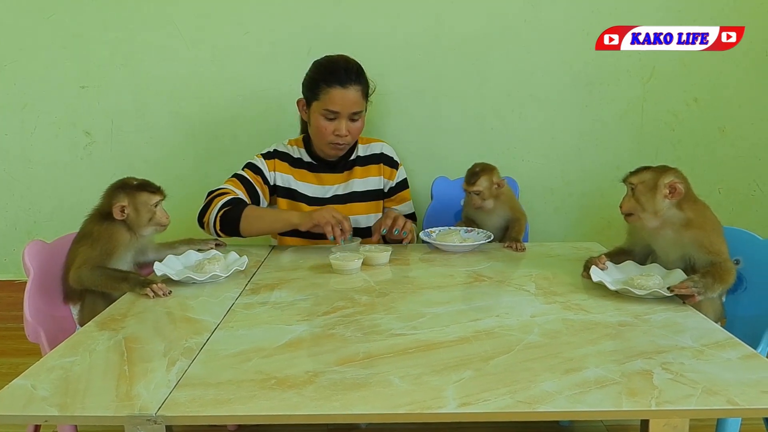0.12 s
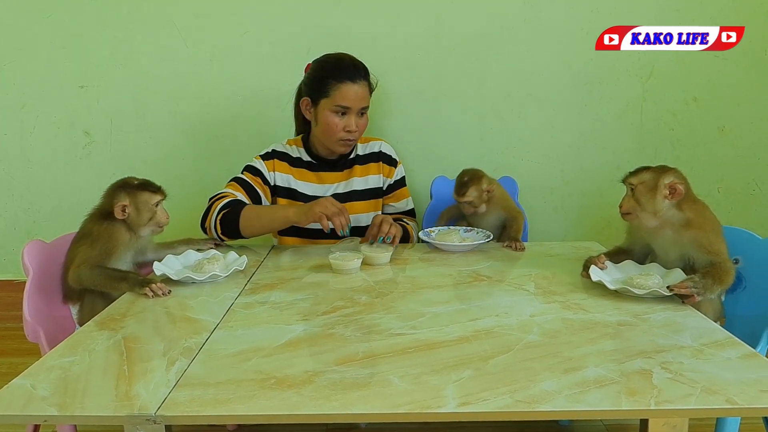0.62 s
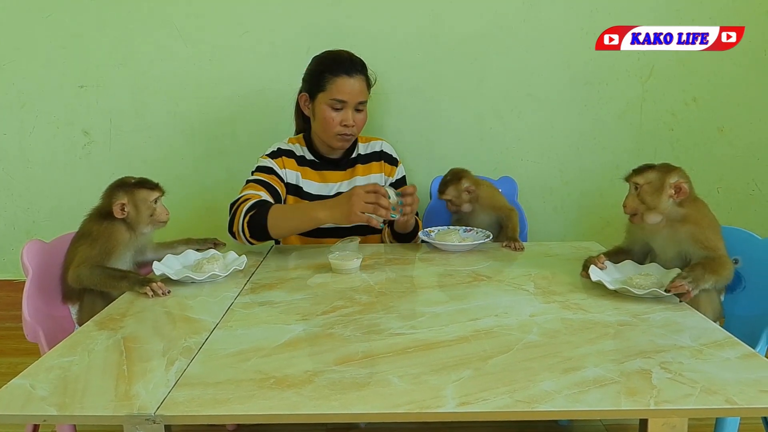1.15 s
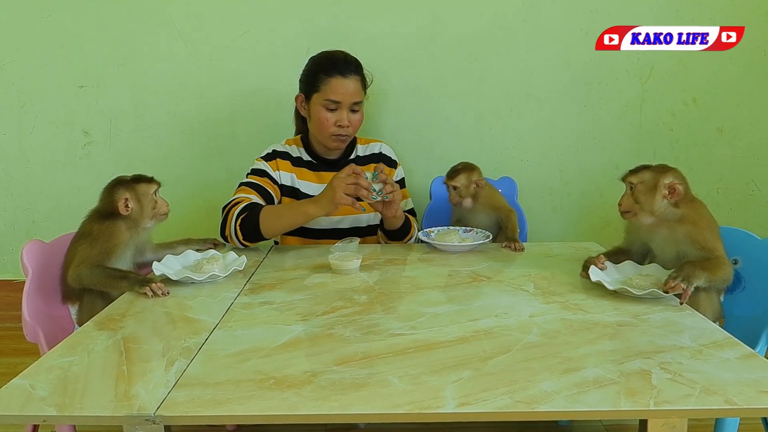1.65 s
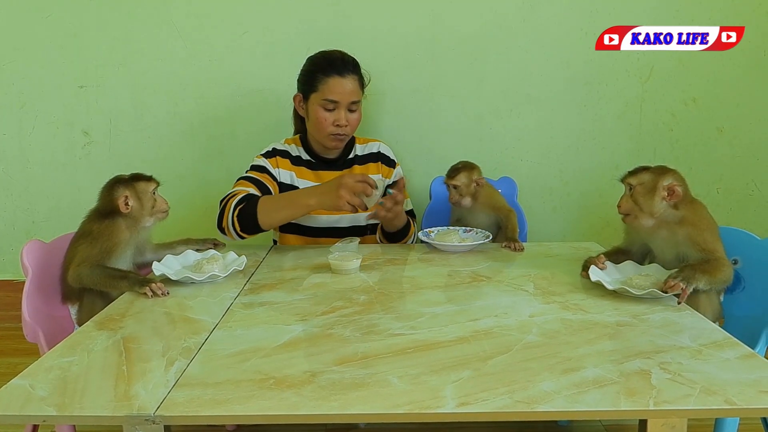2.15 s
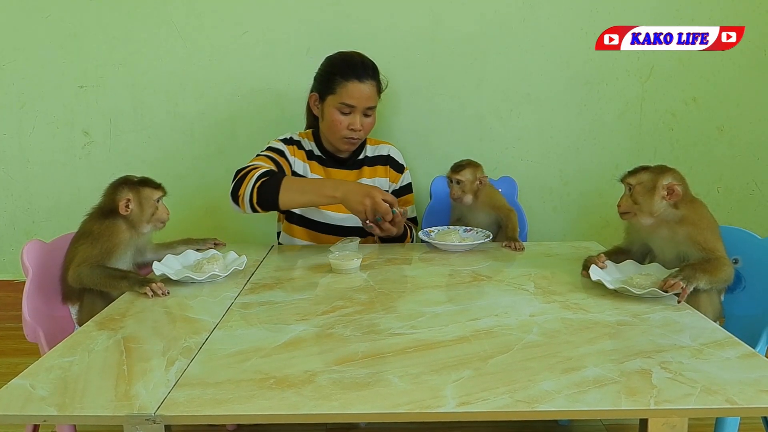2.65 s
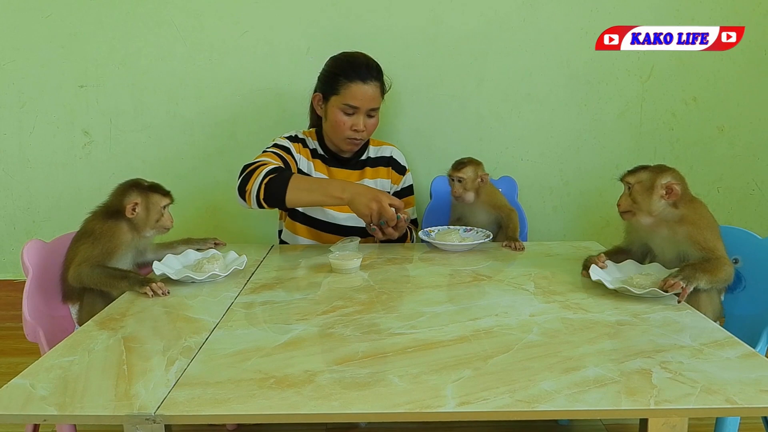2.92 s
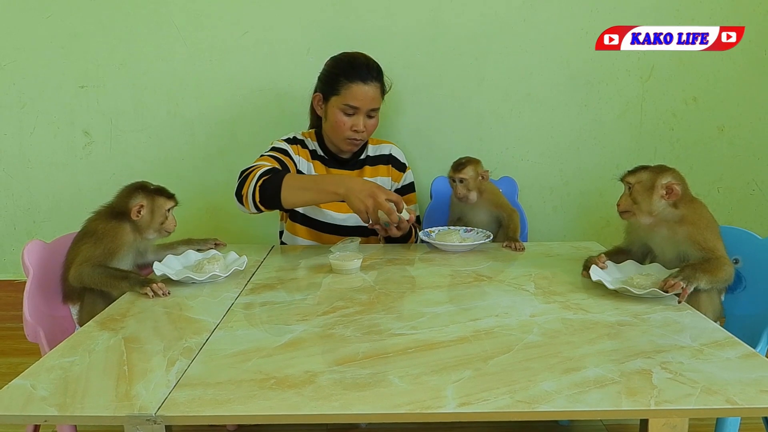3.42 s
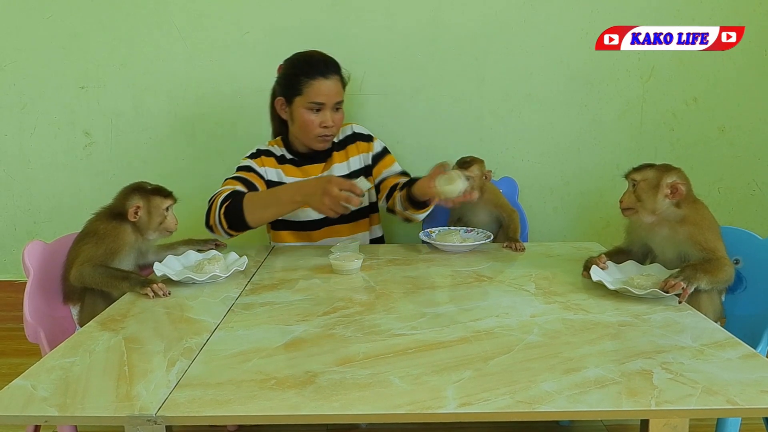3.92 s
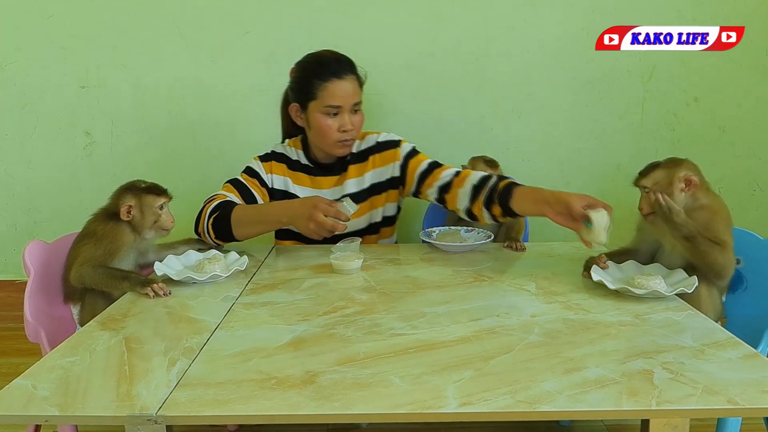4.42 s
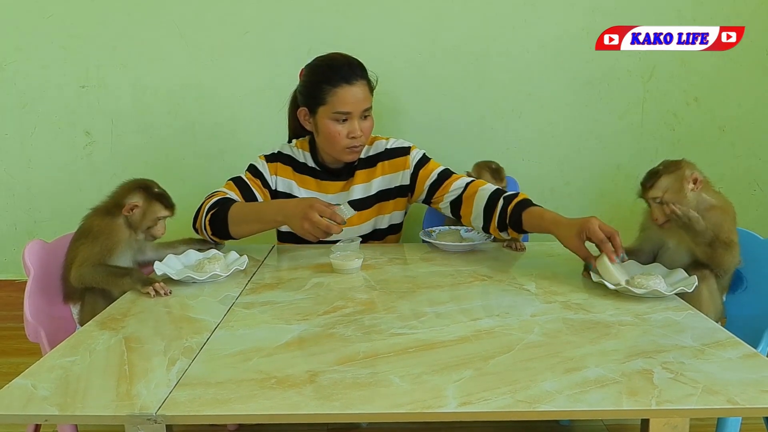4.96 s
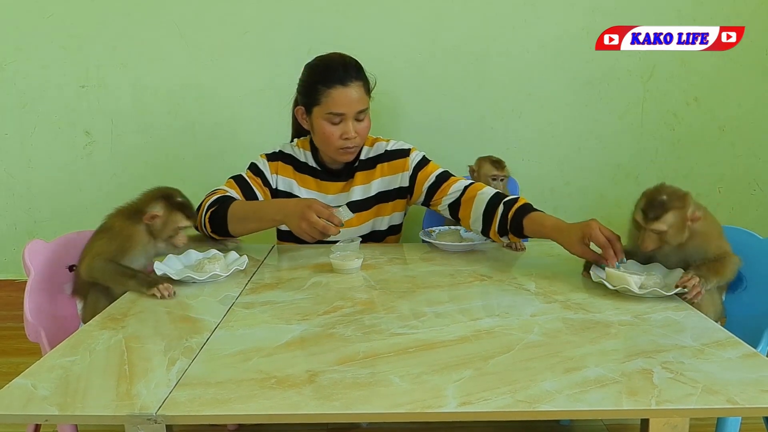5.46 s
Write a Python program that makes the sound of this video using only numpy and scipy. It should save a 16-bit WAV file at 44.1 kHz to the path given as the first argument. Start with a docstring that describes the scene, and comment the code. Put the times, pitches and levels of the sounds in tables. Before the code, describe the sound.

Small plastic cups buckle and click close to a table in a bare, reverberant room. An early pop leads to sparse faint rustles, then a violent crackling snap around the middle that briefly ducks the background. After soft ticks, a plate clatters down with more cup crackle near the end. Low motor hum and soft air noise lie underneath, picked up by a single microphone, stronger on the right.

```python
"""Plastic cups and plates in a bare room

Thin cup walls snap: short crackles shaped by the wall modes. Plates knock on a table: hits ring
a bank of modes. Dull ticks, faint rustling clicks and two low air thumps lie among them.
Hard walls add echoes and a long tail; filtered-noise air and wavering motor tones lie below.
One microphone signal feeds two unequal channels, under a gain control that ducks at loud blows.
"""
import sys
import numpy as np
from scipy import signal
from scipy.fft import rfft, irfft
from scipy.io import wavfile
from scipy.ndimage import uniform_filter1d

SR = 44100
rng = np.random.default_rng(int(sys.argv[2]) if len(sys.argv) > 2 else 0)


def amplitude_ratio(level_db):
    """Convert a level in decibels to the matching linear amplitude (field) ratio."""
    exponent = np.asarray(level_db, float) / 20
    return 10 ** exponent


def unload_audio(sound):
    """Save the sound as a 16-bit wav file, at the path given as the first command line argument."""
    columns = np.transpose(np.atleast_2d(sound))
    # keep every value between -1 and 1, then stretch to whole-number steps
    steps = np.round(np.clip(columns, -1, 1) * 32767)
    wavfile.write(sys.argv[1], SR, steps.astype(np.int16))


N = 246078
LEAD = SR // 4   # samples ahead of t = 0, for sounds that begin before it

# Cup wall buckling: t/s, energy sent to the walls/dB, best-driven f/Hz,
# fall-off away from it/(dB/octave), direct relative to sent/dB
CUP_SNAPS = [(-.03, -21.5, 4200, 15, -3), (.087, -13, 2240, 17.5, 1.5), (.314, -32.5, 5530, 60, 5.5),
             (0.574, -31, 3800, 14, -5), (0.647, -24.5, 1280, 40, 6), (0.809, -24.5, 7900, 9, -6),
             (.8677, -1, 2740, 2.8, 9.5), (1.271, -30.5, 2650, 55, -11), (1.449, -38, 4900, 12, 3),
             (1.643, -31, 2370, 10, -3), (1.732, -43, 8500, 25, 11), (1.869, -41.5, 6950, 20, 7),
             (1.97, -36.5, 4160, 21, -4), (2.07, -23.5, 860, 7.5, 0.5), (2.28, -37.5, 7800, -5, 1),
             (2.607, -30.5, 5340, 42, 3), (2.748, -38, 3100, 37, 5), (2.93, -33.5, 1240, 6, 1.5),
             (3.04, -25, 1680, 3.5, -6), (3.066, -9.5, 4160, 6.5, 0), (3.083, -10, 960, 10, 3),
             (3.093, -12.5, 4660, 6, 3.5), (3.1656, 7, 6550, 8.5, 1.5), (3.169, 11, 1780, 37.5, -3),
             (3.1688, 7, 1005, 4.5, -3), (3.170, 7, 3660, 5, 1.5), (3.493, -14, 1100, 8, 1),
             (3.95, -39, 6900, 13, 8), (3.964, -33.5, 2470, 48, 6.5), (4.228, -22, 4150, 23, 5),
             (4.52, -43.5, 9100, 50, 5), (4.707, -40, 8700, 42, 12), (4.77, -41.5, 5860, 16.5, -1),
             (4.966, -23.5, 5500, 17, 5), (4.998, -28, 1110, 31, 0), (5.026, -24.5, 2460, 39, 5),
             (5.151, -5.5, 1800, 11, -4), (5.179, -1, 3030, 13, 7.5), (5.405, -28, 3160, 56.5, 20)]
# Cup wall modes: f/Hz, sharpness of each of two passes/(f per width), level/dB
CUP_MODES = [(646, 1.5, -0.5), (1256, 2.2, -4.5), (1780, 1.8, -3.2), (2445, 2.07, 0), (3470, 2.65, 0.9),
             (4150, 3.7, -3.9), (4790, 6.3, -0.5), (5690, 4.8, -2.4), (6820, 2.15, -1.5), (8800, 2.34, 0.1),
             (10400, 3.5, -12), (13600, 2.8, -2.5)]
CRACKLE_S, CRACKLE_SHRINK = 0.003, 2.55   # decay at 0 dB direct; dB shorter per dB direct
BELOW_DB_PER_OCTAVE = 9.5   # extra fall-off below best f: a small cup radiates little bass

# Plate knocks on the table: t/s, energy sent to the walls/dB, best-driven f/Hz,
# fall-off away from it/(dB/octave), direct relative to sent/dB
PLATE_KNOCKS = [(-.02, 3.5, 495, 15.5, 4), (5.004, -17.5, 517, 1.5, -5.5), (5.151, -1, 2090, 10.5, 3.5),
                (5.172, 6.5, 1130, 7.5, -2), (5.1781, 6, 397, 0, 1.5), (5.402, -7, 1800, 7, 4.5)]
# Plate and table-top modes: f/Hz, width/Hz, level before the knock's fall-off/dB
PLATE_MODES = [(374.4, 25.4, 6), (446.6, 12, -0.5), (560.3, 8.3, 0.9), (635.6, 43, 2.5), (726.5, 43, 6),
               (1127, 177, 6), (1380, 95, 2), (1560, 40, 1), (1800, 310, 11), (2650, 1000, 13),
               (3215, 120, 7.5), (4900, 320, -1)]

# Room noise spectrum, relative: f/Hz, density/(dB per Hz)
AIR_SPECTRUM = [(25, -26), (60, -12), (120, -8.5), (250, -4.5), (500, -2), (1000, -5.5), (2000, -8),
                (4000, -14.5), (8000, -18), (16000, -32)]
# Room noise course: t/s, level/dB rms
AIR_COURSE = [(0, -53), (1.1, -60.5), (1.6, -58.5), (2.099, -57.5), (2.9, -58), (3.8, -59.5), (4.398, -58),
              (4.901, -58), (5.58, -56)]
# Motor tones: f/Hz, mean level/dB rms
HUM_TONES = [(129.2, -77.5), (177.6, -70.5), (263.8, -67.5), (382.2, -78.5), (532.9, -89)]
RUSTLE_PER_S, RUSTLE_DRIVE_DB = 45, -49

# Small dull ticks close by: t/s, direct peak level/dB, ring f/Hz
DULL_TICKS = [(0.675, -54, 1350), (0.745, -43, 1240), (2.243, -43, 1160), (2.312, -42, 1480),
              (2.566, -50, 1110), (2.662, -41, 1220), (2.818, -41.5, 1390), (3.803, -34, 1352),
              (4.106, -44.5, 1070), (4.417, -41, 1140), (4.709, -42, 1010), (4.791, -44, 796),
              (4.872, -49, 970)]
TICK_SHARPNESS, TICK_ROOM_DB = 2.2, -9   # f per width of each pass; sent relative to direct
# Air pushed out of the cup: t/s, peak level/dB
AIR_PUFFS = [(0.8659, -34.5), (3.167, -34)]

# Tail decay: f/Hz, time to fall 60 dB/s
TAIL_T60 = [(250, 1), (600, 0.87), (1500, 0.79), (3500, 0.73), (7000, 0.69), (14000, 0.46)]
# Tail spectrum: f/Hz, relative level/dB
TAIL_COLOUR = [(250, 0), (600, -2.95), (1500, 2.67), (3500, 2.5), (7000, 7), (14000, 3.5)]
# Echoes off the nearest surfaces: delay/s, level/dB
FIRST_ECHOES = [(.0048, -13.5), (.0095, -5), (0.015, -1.5), (0.026, -7), (0.037, -17.5)]
TAIL_DB, TAIL_RISE_S = -28.5, 0.0031

LIMIT_DB, LIMIT_SHARE = -15, 0.64   # threshold; dB of cut per dB above it
RECOVER_DB_PER_S = 14.5
RIGHT_OVER_LEFT_DB, HISS_DRIVE_DB = 4.5, -64.5
CEILING = 0.85   # full scale = 1


def rms_one(x):
    """Scale to unit rms."""
    return x / np.sqrt(np.mean(x ** 2) + 1e-20)


def peak_one(x):
    """Scale to unit peak."""
    return x / np.abs(x).max()


def energy_one(x):
    """Scale to unit energy."""
    return x / np.sqrt(np.sum(x ** 2))


def on_fft_grid(points, size):
    """Interpolate an (f/Hz, value) table over log f at every bin of a transform of this size."""
    hz, value = np.transpose(points)
    return np.interp(np.log(np.fft.rfftfreq(size, 1 / SR) + 1), np.log(hz), value)


def resonance(x, hz, width_hz):
    """Two-pole band-pass, gain 1 at its top."""
    r = np.exp(-np.pi * width_hz / SR)
    zeros = [(1 - r * r) / 2, 0, (r * r - 1) / 2]
    poles = [1, -2 * r * np.cos(2 * np.pi * hz / SR), r * r]
    return signal.lfilter(zeros, poles, x)


def ringing(force, hz, sharpness):
    """Damped ring with steep skirts: the resonance acts twice."""
    once = resonance(force, hz, hz / sharpness)
    return peak_one(resonance(once, hz, hz / sharpness))


def drift(rate_hz):
    """Slow random wander: straight lines between random points of unit spread."""
    points = rng.standard_normal(64)
    return np.interp(np.arange(N) / SR * rate_hz, np.arange(64), points)


def contact(decay_s, rattle=0.19):
    """Sharp first contact with a decaying rattle of smaller ones behind it."""
    t = np.arange(4096) / SR
    burst = rng.standard_normal(4096) * np.exp(-t / decay_s) * rattle
    burst[0] = 1
    return burst


def add(track, s, sound):
    """Lay a short sound into a track that starts LEAD samples early."""
    at = LEAD + round(s * SR)
    track[at:at + len(sound)] += sound[:len(track) - at]


def quickest(power):
    """Shortest causal ring with this power spectrum (minimum phase, by folding the cepstrum)."""
    cepstrum = irfft(np.log(power + 1e-12 * power.max()) / 2)
    half = len(cepstrum) // 2
    folded = np.r_[cepstrum[0], 2 * cepstrum[1:half], cepstrum[half], np.zeros(half - 1)]
    return irfft(np.exp(rfft(folded)))


def snaps():
    """Tiny cracks drive the cup modes, most near the buckle's pitch; returns direct, sent to walls."""
    direct, sent = np.zeros((2, N + LEAD))
    impulse = (np.arange(4096) == 0) * 1.
    cup_power = 0
    for hz, sharpness, level_db in CUP_MODES:
        power = np.abs(rfft(ringing(impulse, hz, sharpness))) ** 2
        cup_power = cup_power + amplitude_ratio(level_db) ** 2 * power / power.max()
    bin_hz = np.fft.rfftfreq(len(impulse), 1 / SR) + 1
    for s, db, best_hz, fall_db, direct_db in CUP_SNAPS:
        octaves = np.log2(bin_hz / best_hz)
        drive_db = -fall_db * np.abs(octaves) + BELOW_DB_PER_OCTAVE * np.minimum(octaves, 0)
        # over all directions the crackle's colour evens out
        evened = quickest(cup_power * amplitude_ratio(drive_db) ** 2)
        # crisp snaps arrive most directly
        crackle = contact(CRACKLE_S * amplitude_ratio(-CRACKLE_SHRINK * direct_db), rattle=0.35)
        crackled = signal.fftconvolve(evened, crackle)[:len(evened)]
        add(direct, s, amplitude_ratio(db + direct_db) * energy_one(crackled))
        add(sent, s, amplitude_ratio(db) * energy_one(evened))
    return direct, sent


def knocks():
    """Each knock drives the same modes, most near a pitch set by where and how hard it lands."""
    direct, sent = np.zeros((2, N + LEAD))
    no_bass = signal.butter(3, 260, "high", fs=SR, output="sos")
    for s, db, best_hz, fall_db, direct_db in PLATE_KNOCKS:
        force = signal.sosfilt(no_bass, contact(decay_s=0.00052))
        body = 0
        for k, (hz, width_hz, level_db) in enumerate(PLATE_MODES):
            mode_db = level_db - fall_db * abs(np.log2(hz / best_hz))
            mode = peak_one(resonance(force, hz, width_hz))
            body = body + (-1) ** k * amplitude_ratio(mode_db) * mode   # signs alternate
        body = body * np.hanning(2 * len(body))[len(body):]   # dies away fully
        body = amplitude_ratio(db) * energy_one(body)
        add(direct, s, amplitude_ratio(direct_db) * body)
        add(sent, s, body)
    return direct, sent


def room(x):
    """A few first echoes, then a dense noise tail that builds up and dies band by band."""
    t = np.arange(SR) / SR
    hz, t60_s = np.transpose(TAIL_T60)
    spectrum = rfft(rng.standard_normal(SR)) * amplitude_ratio(on_fft_grid(TAIL_COLOUR, SR))
    tail = 0
    for k in range(len(hz)):   # overlapping bands that sum to one
        weight = on_fft_grid(np.c_[hz, np.arange(len(hz)) == k], SR)
        tail = tail + irfft(spectrum * weight, SR) * amplitude_ratio(-60 * t / t60_s[k])
    response = amplitude_ratio(TAIL_DB) * tail * (1 - np.exp(-t / TAIL_RISE_S))
    for s, db in FIRST_ECHOES:
        response[round(s * SR)] += amplitude_ratio(db)
    return signal.fftconvolve(x, response)[:len(x)]


def air():
    """Room air: noise of smooth spectrum that swells a little."""
    s, db = np.transpose(AIR_COURSE)
    noise = rms_one(irfft(rfft(rng.standard_normal(N)) * amplitude_ratio(on_fft_grid(AIR_SPECTRUM, N)), N))
    level_db = np.interp(np.arange(N) / SR, s, db) + 0.16 * drift(rate_hz=2.1)
    return noise * amplitude_ratio(level_db)


def hum():
    """Low motor tones: sines that waver in level and slightly in pitch."""
    total = 0
    for hz, db in HUM_TONES:
        level = np.sqrt(2) * amplitude_ratio(db + 1.1 * drift(rate_hz=3.996))
        phase = 2 * np.pi * np.cumsum(hz + 2.46 * drift(rate_hz=10)) / SR
        total = total + level * np.sin(phase)
    return total


def rustle():
    """Faint clicks at random times and sizes, each ringing one of ten pitches."""
    sizes = amplitude_ratio(1.9 * np.minimum(rng.exponential(1, N), 4))
    sizes = sizes * (rng.random(N) < RUSTLE_PER_S / SR)
    dealt = rng.integers(0, 10, N)
    clicks = 0
    for k, hz in enumerate(np.geomspace(900, 9000, 10)):
        clicks = clicks + resonance(sizes * (dealt == k) + 1e-18, hz, hz / 3)
    return np.r_[np.zeros(LEAD), amplitude_ratio(RUSTLE_DRIVE_DB) * clicks]


def ticks():
    """Brief contacts ring one broad resonance each; returns direct, sent to walls."""
    direct = np.zeros(N + LEAD)
    for s, db, hz in DULL_TICKS:
        add(direct, s, amplitude_ratio(db) * ringing(contact(decay_s=0.00012), hz, TICK_SHARPNESS))
    return direct, amplitude_ratio(TICK_ROOM_DB) * direct


def puffs():
    """Low thumps: one-sided pressure pushes of about a millisecond, too close to stir the room."""
    out, t = np.zeros(N + LEAD), np.arange(1024) / SR
    for s, db in AIR_PUFFS:
        add(out, s, amplitude_ratio(db) * peak_one(t * np.exp(-t / 0.00066)))
    return out


def gain_control(x):
    """Loud blows pull the gain down at once; it creeps back at a steady dB rate."""
    level_db = 10 * np.log10(uniform_filter1d(x ** 2, size=128).clip(1e-12))
    ramp_db = RECOVER_DB_PER_S * np.arange(N) / SR
    cut_db = LIMIT_SHARE * np.maximum(level_db - LIMIT_DB, 0)
    held_db = np.maximum.accumulate(cut_db + ramp_db) - ramp_db
    return amplitude_ratio(-uniform_filter1d(held_db, size=64))


def scene():
    """Cup, plate and small sounds in the room, over air and hum; same signal to both channels."""
    faint = rustle()
    direct, sent = np.sum([snaps(), knocks(), [faint, faint], ticks()], axis=0)
    sound = (direct + puffs() + room(sent))[LEAD:] + air() + hum()
    return np.array([sound, sound])


def top_cut(x):
    """Nothing passes above the cut-off."""
    return signal.sosfilt(signal.butter(12, 16660, fs=SR, output="sos"), x)


def record(dry):
    """Louder right channel, bright hiss per channel, shared gain control, rounded peaks, low-pass."""
    hiss = amplitude_ratio(HISS_DRIVE_DB) * signal.lfilter([1, -0.6], [1], rng.standard_normal(dry.shape))
    balance = amplitude_ratio([[-RIGHT_OVER_LEFT_DB / 2], [RIGHT_OVER_LEFT_DB / 2]])
    mix = (dry * balance + hiss) * gain_control(dry[0])
    mix = mix / (1 + (np.abs(mix) / CEILING) ** 4) ** (1 / 4)
    low_pass = signal.cheby2(10, 50, 16600, fs=SR, output="sos")   # 50 dB down from 16.6 kHz
    mix = signal.sosfilt(low_pass, mix)
    return top_cut(mix)


dry = scene()
out = record(dry)
unload_audio(out)
```